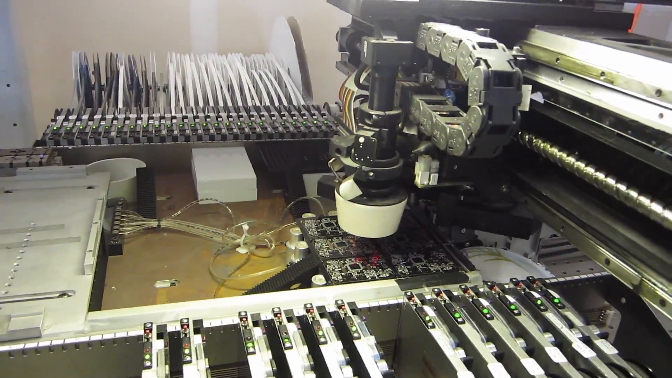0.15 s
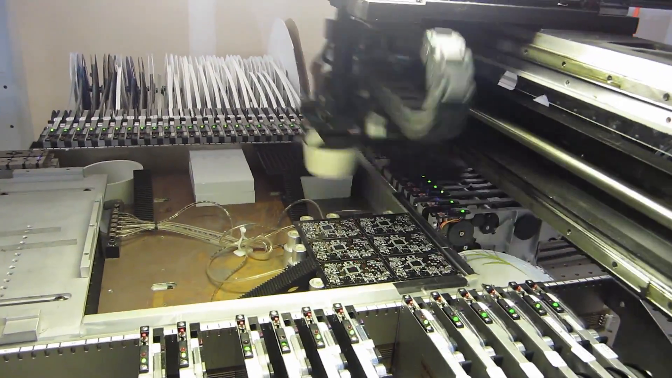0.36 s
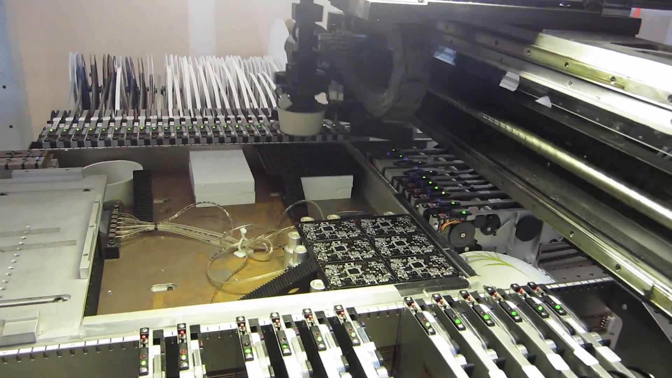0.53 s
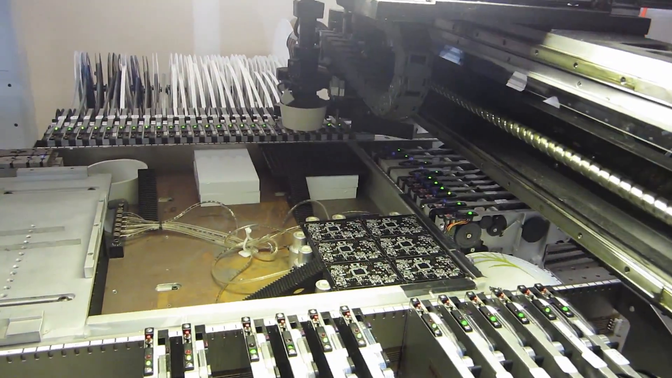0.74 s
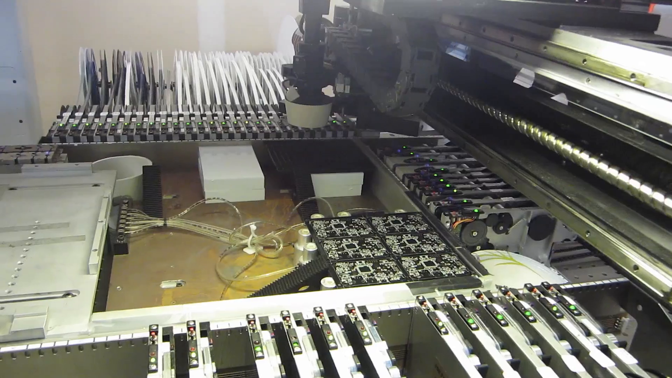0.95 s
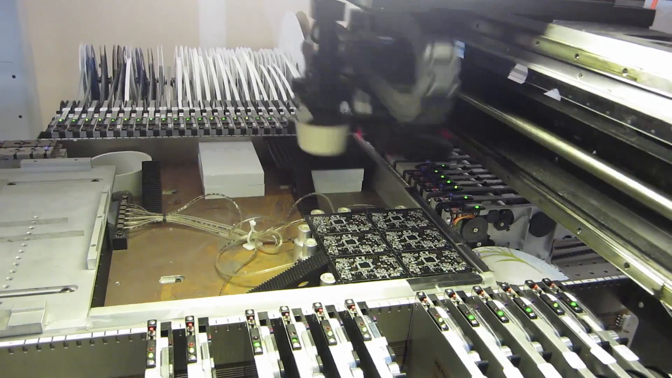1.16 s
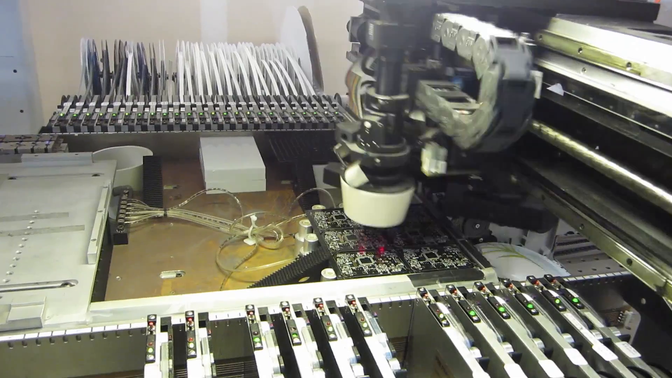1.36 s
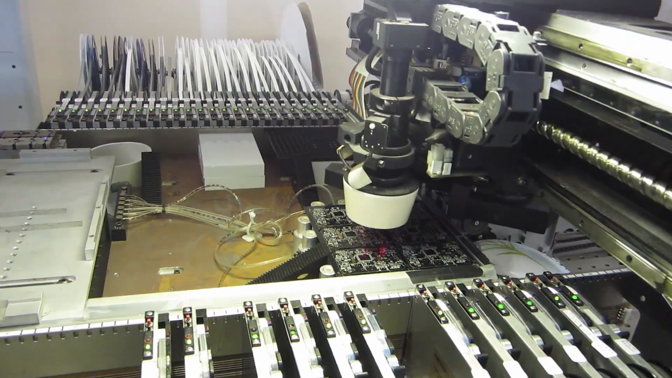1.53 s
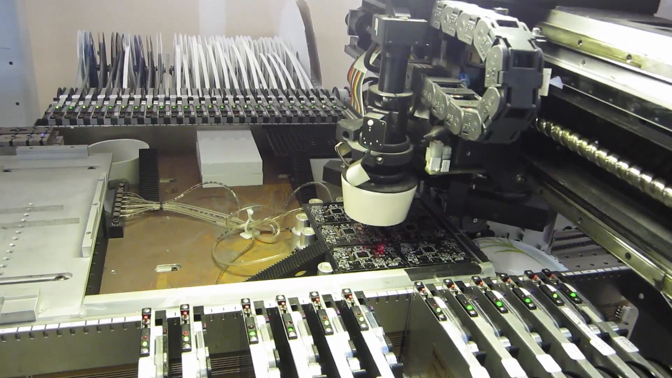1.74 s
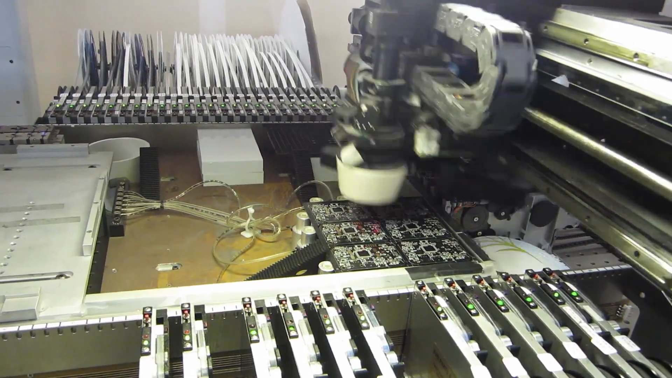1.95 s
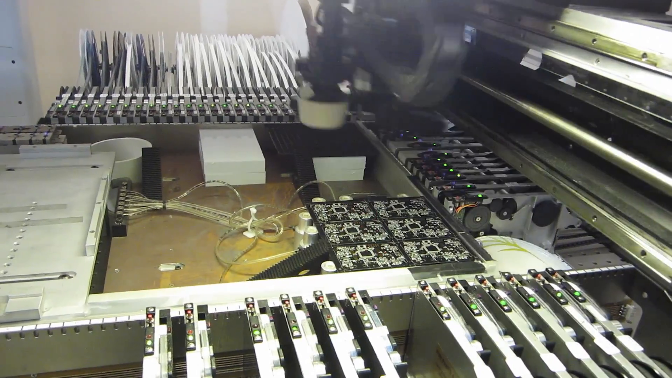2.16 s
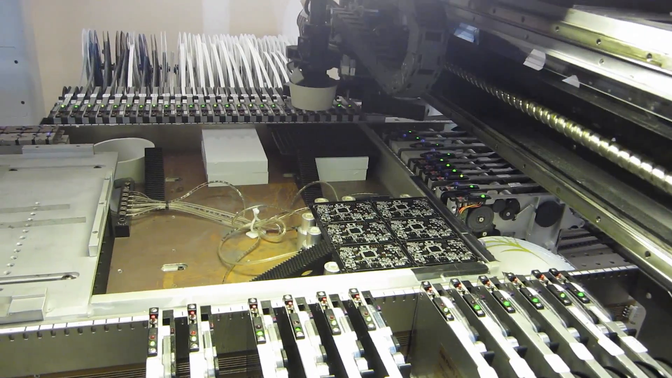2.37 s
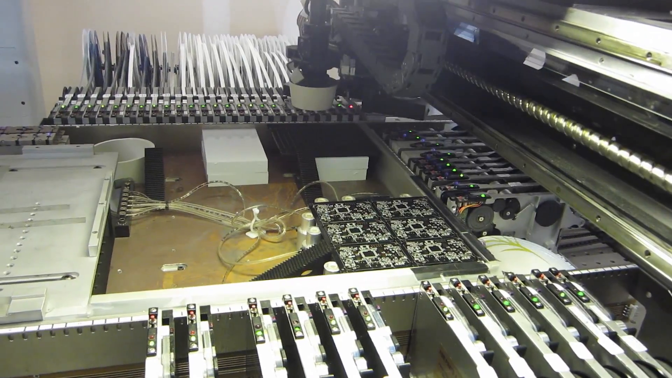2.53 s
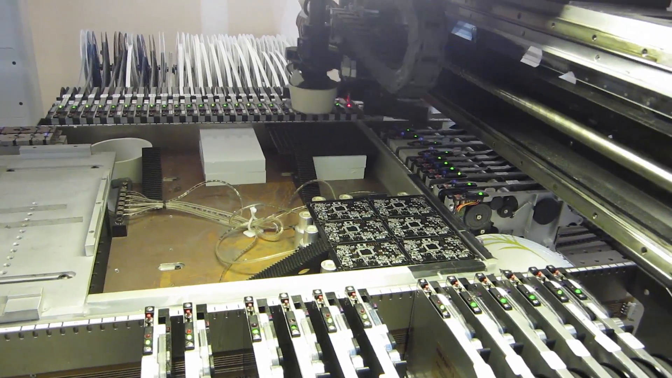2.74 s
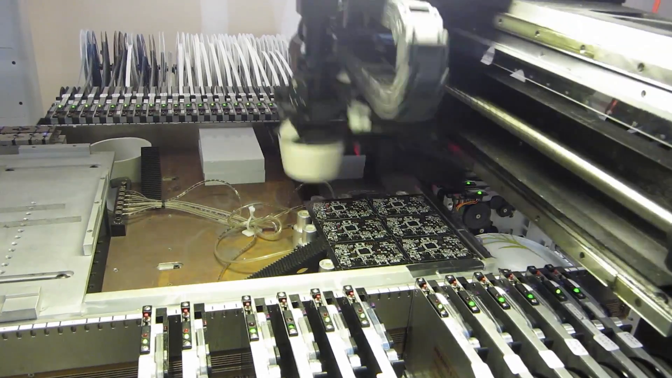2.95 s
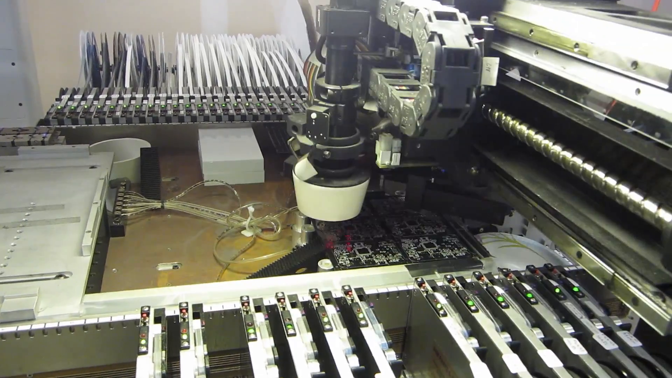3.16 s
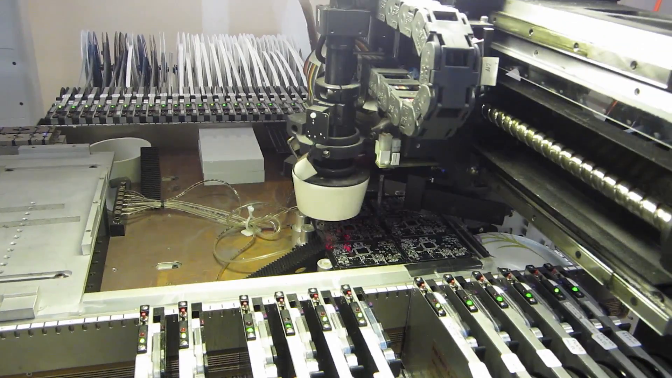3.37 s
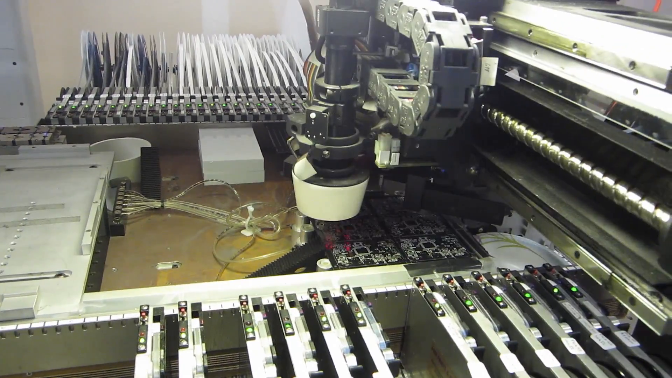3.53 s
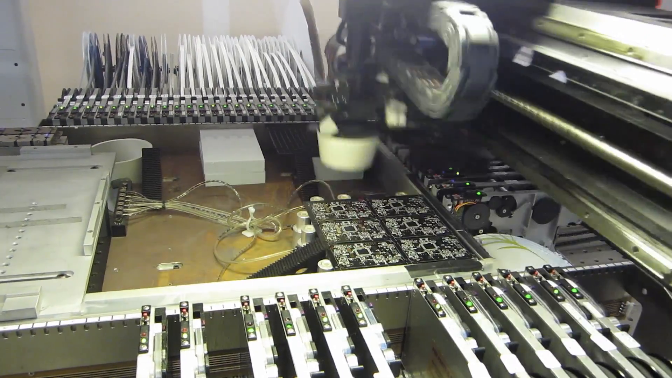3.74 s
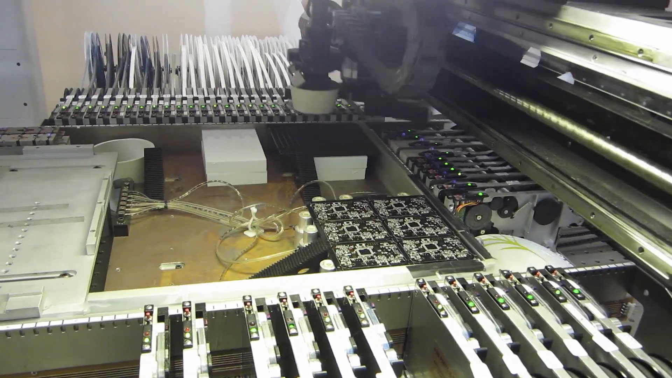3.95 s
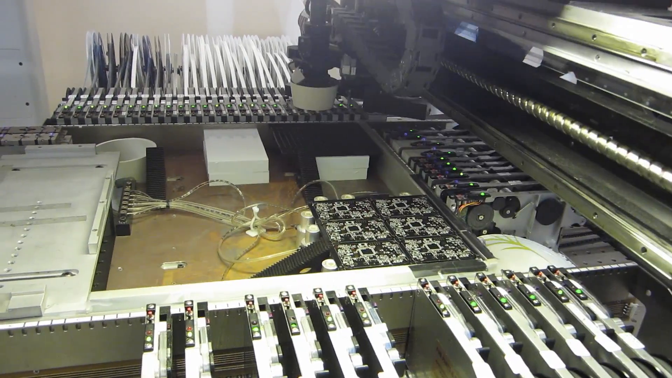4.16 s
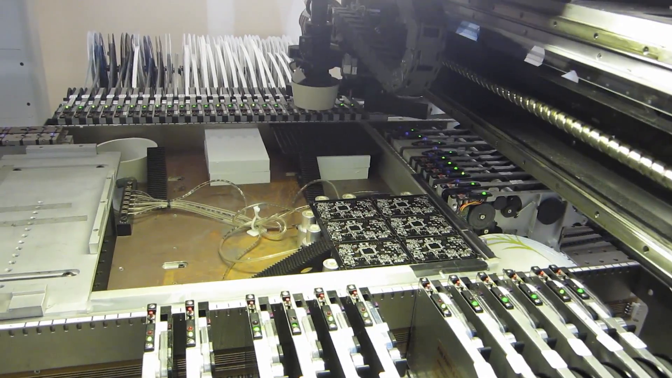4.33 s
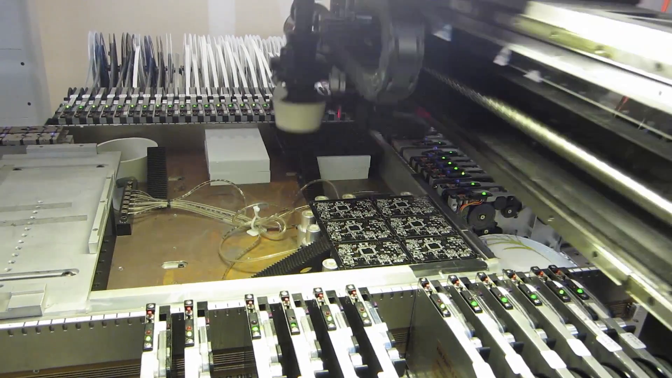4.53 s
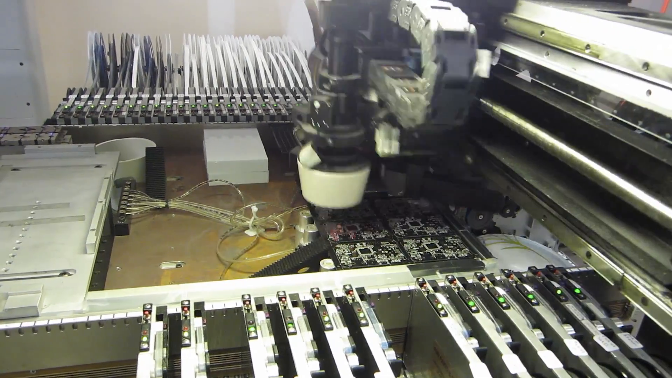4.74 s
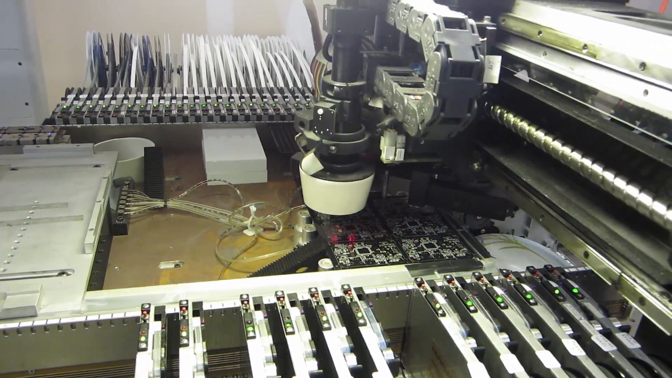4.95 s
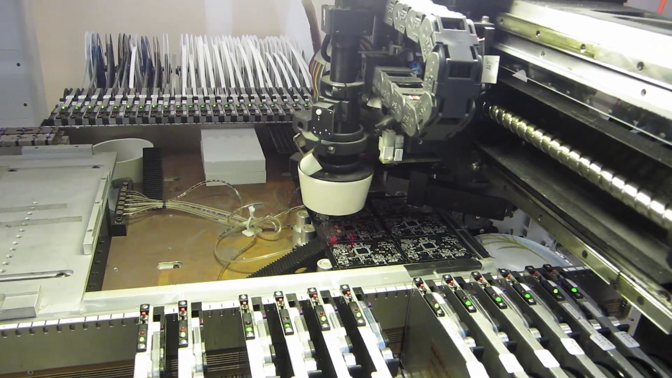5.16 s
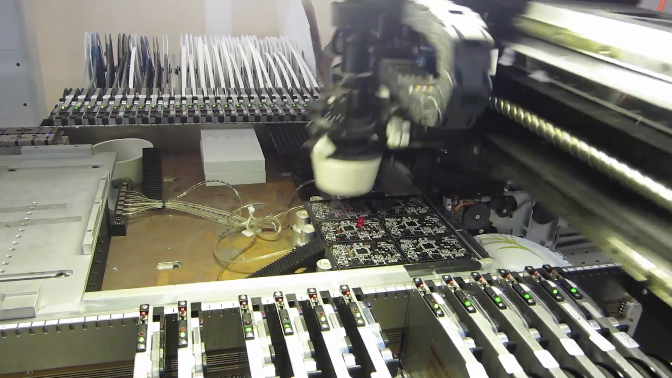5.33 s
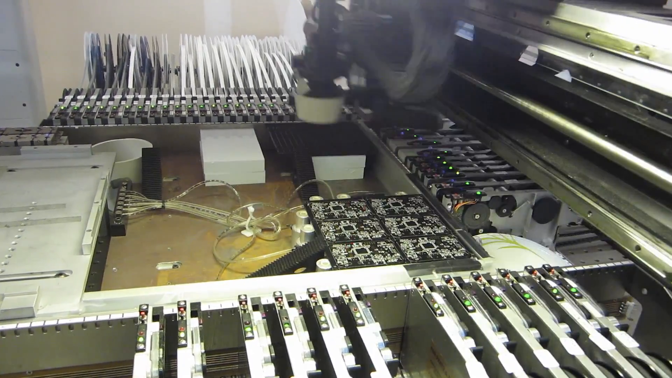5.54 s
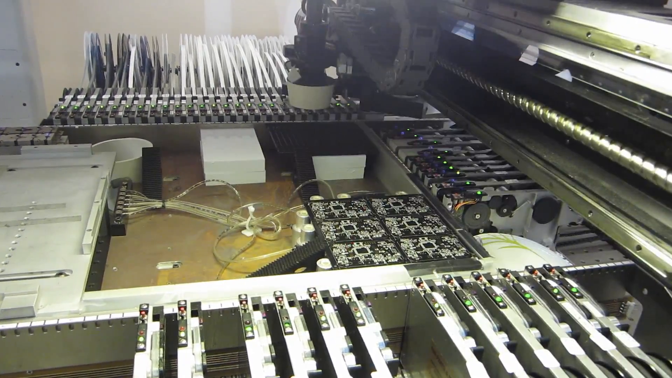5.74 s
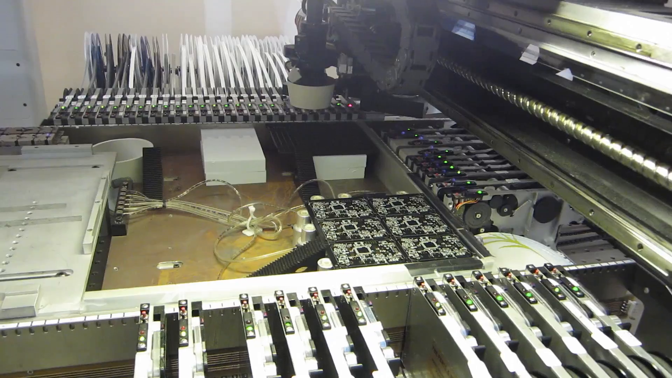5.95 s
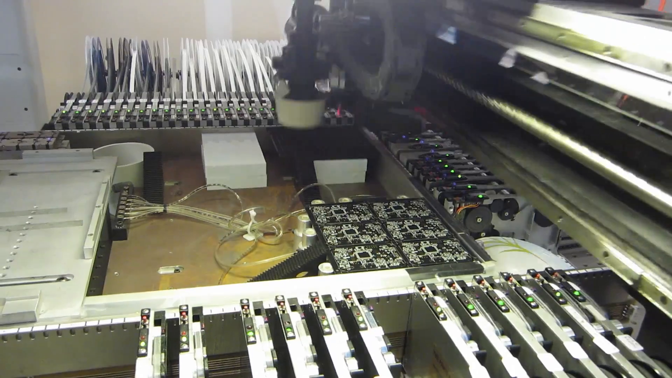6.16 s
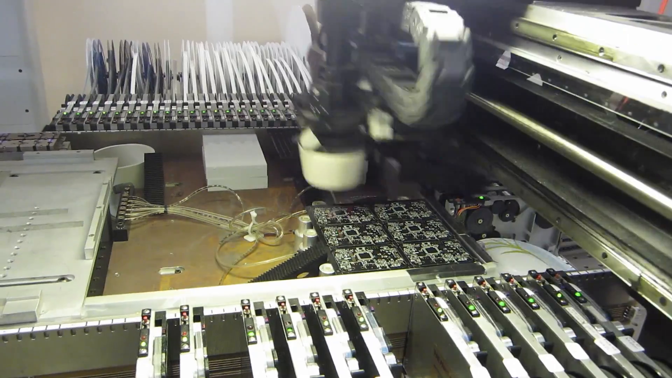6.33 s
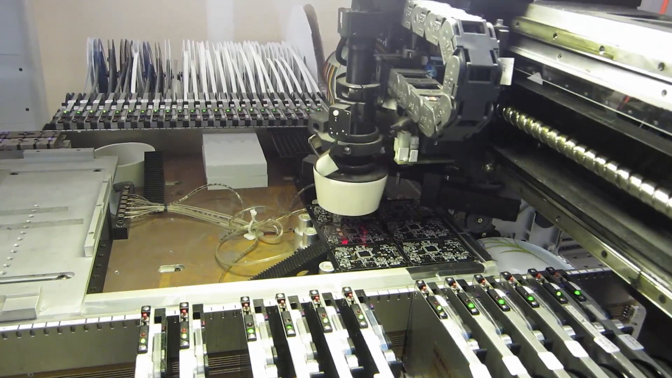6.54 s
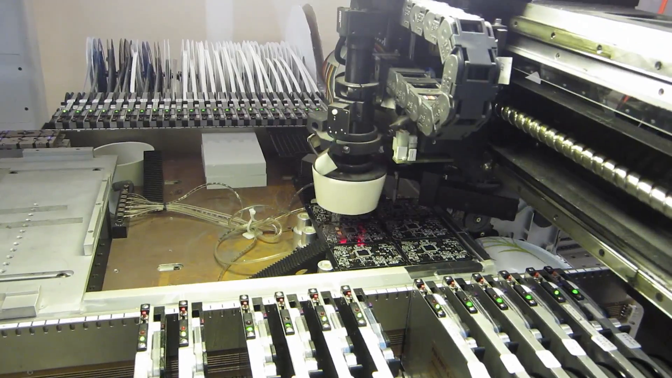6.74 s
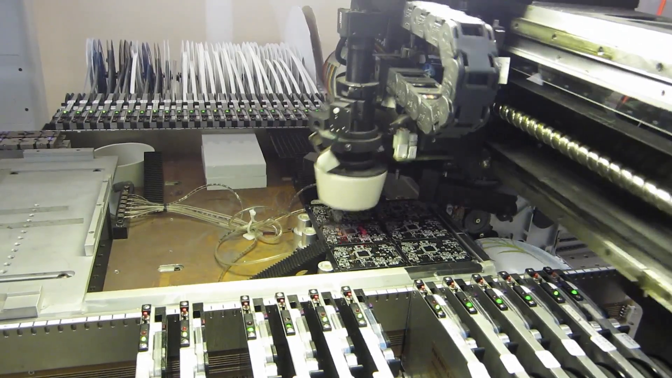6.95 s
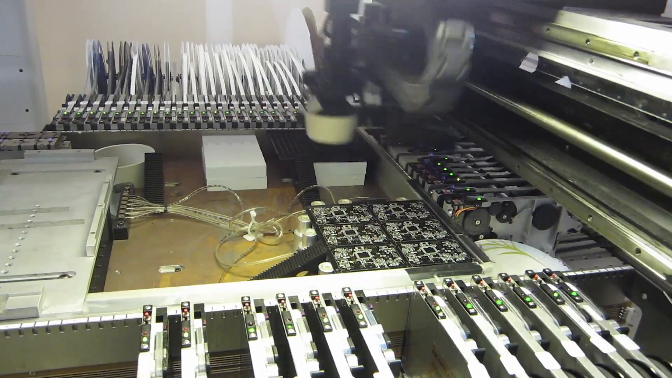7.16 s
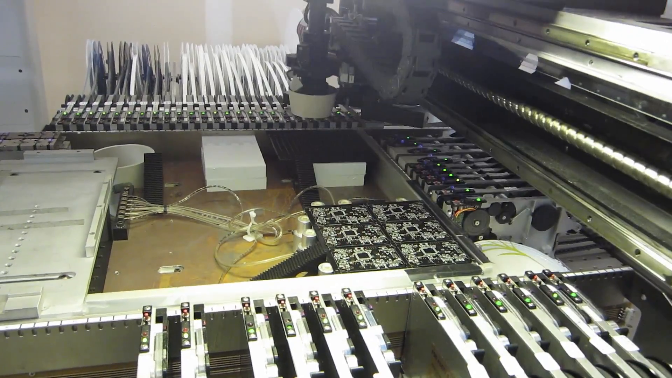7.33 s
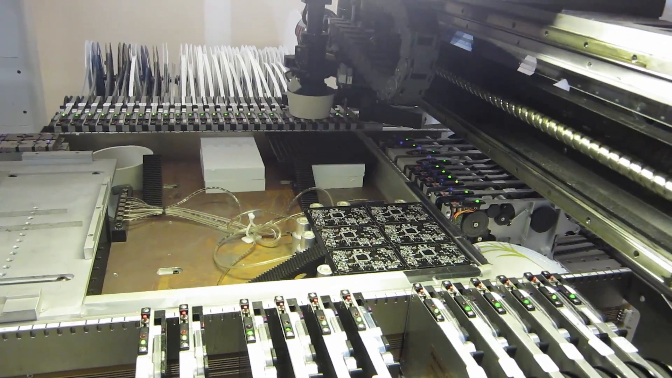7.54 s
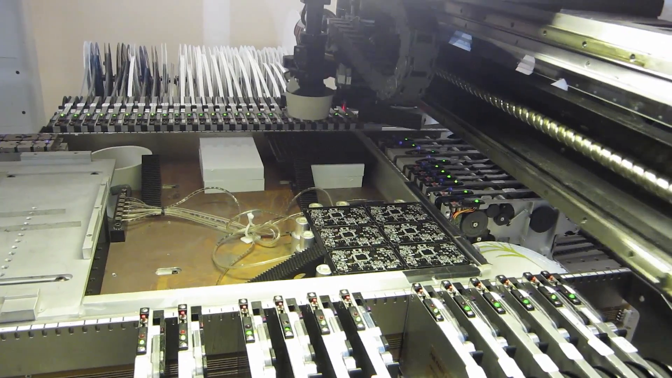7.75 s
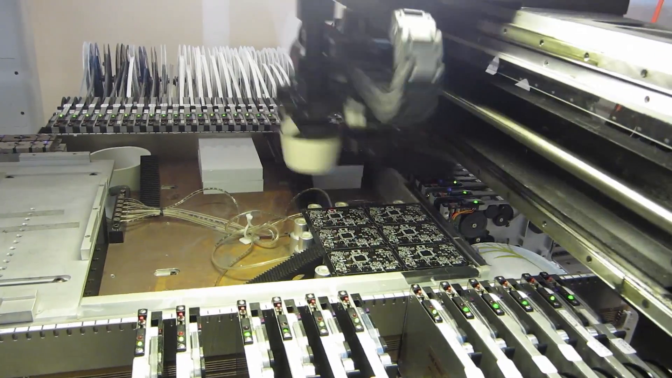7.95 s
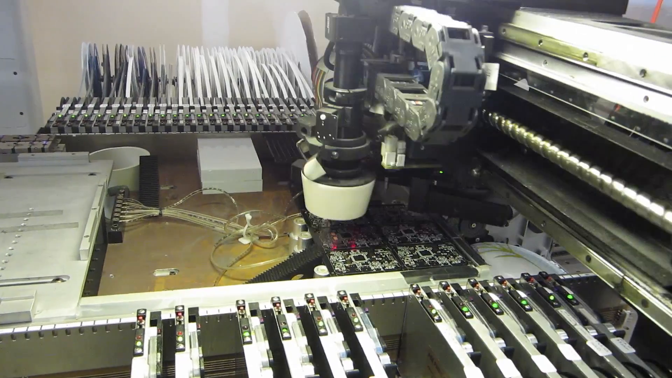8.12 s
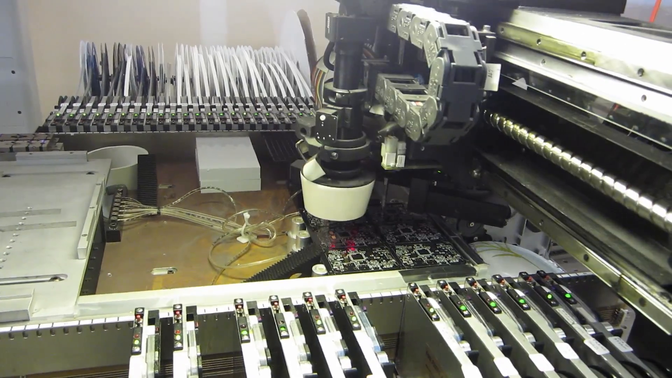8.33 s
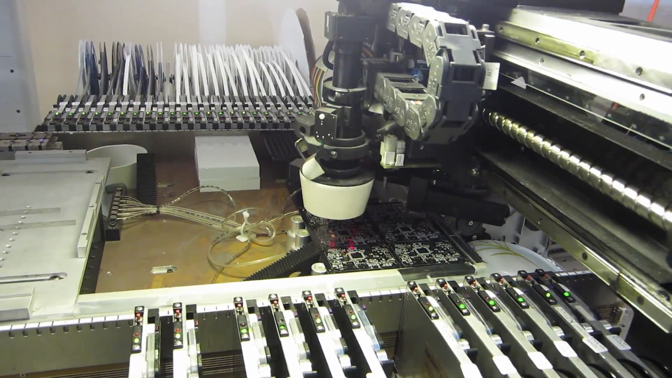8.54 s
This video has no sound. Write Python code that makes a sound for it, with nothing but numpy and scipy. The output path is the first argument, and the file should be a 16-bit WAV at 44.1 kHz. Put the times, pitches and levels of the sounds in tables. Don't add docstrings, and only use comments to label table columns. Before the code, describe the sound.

A machine head shuttles between feeders and circuit board, out and back, in a regular rhythm. Each move swells into a metallic, grainy whoosh with a gliding motor tone, then brakes. Short clean squeals from the nozzle come in twos between moves, with snapping clicks and dull jolts. Low hum and faint airy whistle stay constant. Heard close, mono, with short reverberation from the metal enclosure.

```python
import sys
import numpy as np
from scipy import signal
from scipy.fft import rfft, irfft, next_fast_len
from scipy.io import wavfile
from scipy.ndimage import uniform_filter1d, map_coordinates

SR = 44100
rng = np.random.default_rng(int(sys.argv[2]) if len(sys.argv) > 2 else 0)


def ratio(d):
    e = np.asarray(d, float) / 20
    return 10 ** e


def master(y):
    cut = np.clip(np.atleast_2d(y).T, -1, 1)
    pcm = np.round(cut * 32767)
    wavfile.write(sys.argv[1], SR, pcm.astype(np.int16))


N = 383229
TIME = np.arange(N) / SR

# start_s, stop_s, whine_db, frame_ring_db, belt_rasp_db
MOVES = [(0.21, 0.713, -36.5, -27, -25), (1.038, 1.549, -37.5, -27.5, -26.5),
         (1.908, 2.41, -36, -26.5, -25.5), (2.727, 3.225, -36, -27.5, -27.5),
         (3.63, 4.122, -37, -27.5, -27.5), (4.445, 4.928, -34, -27, -26), (5.287, 5.77, -35.5, -27, -27),
         (6.101, 6.584, -34.5, -27, -27), (6.972, 7.452, -36, -26, -26.5), (7.776, 8.269, -35, -27, -26.5),
         (8.616, 9.097, -38, -26, -22)]


def gantry():
    pace = np.array([speed(start, stop, ramp=.205) for start, stop, *levels in MOVES])
    moving = pace.sum(0)
    return motors(pace) + frame() + belts(moving) + base() + air(moving)


# start_s, stop_s, ramp_s, top_hz, whine_db
CROSS_MOVES = [(1.09, 1.33, .12, 4000, -41), (2.83, 3.08, .125, 4000, -34), (3.645, 3.895, .125, 3980, -33),
               (4.45, 4.67, .11, 3700, -41), (5.295, 5.545, .125, 3700, -36),
               (6.105, 6.325, .11, 3100, -35), (6.98, 7.2, .11, 3200, -35), (7.775, 7.995, .11, 3420, -35)]
# multiple_of_tooth_tone, level_db
CARRIAGE = [(.25, -8), (.5, -4), (.75, -14), (1.5, -21)]
# multiple_of_tooth_tone, level_db
SHAFT = [(.122, -9)]
# pitch_hz, level_db
NOZZLE_TURN = [(1750, -48), (2770, -48), (3500, -43), (5670, -53), (6150, -55)]


def motors(pace):
    tooth_hz = 7000
    moving = pace.sum(0)
    loud = ratio([db for start, stop, db, *rest in MOVES]) @ pace
    strain = 4 * moving * (1 - moving)
    strain_db = np.where(np.gradient(moving) > 0, 3.5, -1.5) * strain
    audible = np.clip(2.8 * moving - .7, 0, 1)
    tooth = whine(tooth_hz * moving, [(1, 3)], flutter_db=2.5 + 4 * strain, rate=140)
    tones = loud * audible * ratio(strain_db) * tooth
    carriage = whine(tooth_hz * moving, CARRIAGE, flutter_db=5.0, rate=90)
    tones += ratio(3.0) * loud * moving ** 4 * carriage
    tones += loud * whine(tooth_hz * moving, SHAFT, flutter_db=6, rate=50)
    turning = speed(6.475, 6.635, ramp=0.053)
    tones += ratio(-1) * turning ** 3 * whine(turning, NOZZLE_TURN, flutter_db=4, rate=150)
    clean = 0
    for start, stop, ramp, top_hz, db in CROSS_MOVES:
        cross = speed(start, stop, ramp)
        tone = whine(top_hz * cross, [(1, 0), (.5, -8)], flutter_db=2, rate=110)
        clean += ratio(db + 9) * cross ** 4 * tone
    return scattered(tones, t60=.05, share=.55) + clean


# start_s, stop_s, frame_ring_db, rasp_db
TURNS = [(-.02, 0.046, -42, -39), (1.42, 1.519, -46, -44), (3.209, 3.298, -48, -35),
         (4.836, 4.92, -47, -39), (4.948, 5.01, -38, -34), (6.494, 6.65, -44, -37.5),
         (8.167, 8.248, -47, -38)]
# pitch_hz, width_hz, level_db
FRAME = [(851, 21, 3), (1073, 22, 5.5), (1182, 42, 11.5), (1300, 35, 9), (1726, 49, 11.5), (2067, 190, 5.5)]
# pitch_hz, density_db_per_hz
FRAME_BED = [(100, -62), (600, -6), (900, 4), (2000, -6), (3000, -24), (8000, -24.5)]


def frame():
    ring = sum(ratio(db) * swell(start, stop, lag=0.0099, rise=0.17, fall=0.29, late=0.045, steep=1.03, sag_db=13)
               for start, stop, _, db, _ in MOVES)
    ring += sum(ratio(db) * speed(start, stop, ramp=0.027) for start, stop, db, _ in TURNS)
    return ring * ratio(0.62 * wobble(60)) * rush(FRAME_BED, FRAME, rough_db=2.0, patchy_db=0.5)


# pitch_hz, width_hz, level_db
BELT = [(2470, 56, 1.7), (2710, 127, 2.7), (3015, 96, 3), (3303, 110, 6.8), (3654, 160, 6.5),
        (4040, 260, 1.7), (5300, 76, 0.84), (5790, 35, 1.5)]
# pitch_hz, density_db_per_hz
BELT_BED = [(600, -23), (2000, 1.5), (3000, 0), (4600, -1), (6500, -2), (9000, -7), (16000, -16.5)]


def belts(moving):
    scrape = sum(ratio(db) * swell(start, stop, lag=0.039, rise=0.11, fall=0.18, late=0.017, steep=1.36, sag_db=15.6)
                 for start, stop, _, _, db in MOVES)
    scrape += ratio(-38.5) * sum(speed(start, stop, ramp) for start, stop, ramp, *rest in CROSS_MOVES)
    scrape += sum(ratio(db) * speed(start, stop, ramp=0.053) for start, stop, _, db in TURNS)
    rasp = rush(BELT_BED, BELT, rough_db=1.2, patchy_db=1.8)
    dull = filtered(rasp, lambda f: 1 / (1 + (f / 3800) ** 6))
    bright = (0.52 + 0.6 * moving ** 2) * (rasp - dull)
    return scrape * ratio(0.92 * wobble(40)) * (dull + bright)


# pitch_hz, width_hz, level_db
BASE = [(422.6, 60, 4.3), (506, 115, 9.9), (567, 26, 0.71)]
# lag_s, rise_s, fall_s, late_s, steepness, sag_db_per_s
BASE_SWELLS = [
    (-.01, 0.058, 0.13, .16, 0.92, 24),
    (-.01, .13, 0.15, 0.19, 0.63, 30),
]


def base():
    level_db = (-38.5, -37.5)
    drone = sum(ratio(level_db[k % 2]) * swell(start, stop, *BASE_SWELLS[k % 2])
                for k, (start, stop, *levels) in enumerate(MOVES))
    noise = filtered(rng.standard_normal(N), lambda f: ringing(BASE, f) ** 2)
    return drone * ratio(1.4 * wobble(25)) * unit(noise)


# pitch_hz, density_db_per_hz
AIR = [(2000, -23), (6000, 0), (9000, -3), (12000, 3), (16000, -18)]


def air(moving):
    return ratio(-42.5) * moving ** 1.5 * rush(AIR, rough_db=2.5)


# start_s, stop_s, held_tone_db, ramp_squeal_db
STROKES = [(0.0833, 0.148, -27.5, -25), (0.77, 0.8213, -38, -37), (0.8808, 0.936, -36.5, -34.5),
           (1.622, 1.6878, -30.5, -25.5), (1.778, 1.8443, -27.5, -24.5), (2.461, 2.513, -41, -37),
           (2.573, 2.625, -38.5, -36), (3.3442, 3.4058, -39, -34.5), (3.5003, 3.567, -30.5, -33.5),
           (4.176, 4.225, -43, -38), (4.288, 4.339, -44, -36), (5.001, 5.063, -36, -31),
           (5.155, 5.2215, -29, -31), (5.8294, 5.88, -44, -38), (5.943, 5.991, -42, -34.5),
           (6.683, 6.746, -36, -28.5), (6.8381, 6.9036, -28.5, -28.5), (7.506, 7.557, -38.8, -37),
           (7.6163, 7.6683, -40, -36), (8.3395, 8.4044, -33, -29.5), (8.4946, 8.5624, -26.5, -30)]
# held_octave_db, nut_tone_db
STROKE_KINDS = [
    (-36.5, -36),
    (-45.5, -39.5),
    (-42, -46.5),
    (-37.5, -36.5),
]
# pitch_hz, width_hz, level_db
HEAD = [(1233, 79, 8.9), (1599, 40, 10), (2200, 72, 7), (3020, 270, 9), (3440, 89, 3.7), (3680, 310, 3.4),
        (6520, 250, 6)]
# pitch_hz, density_db_per_hz
HEAD_BED = [(300, -90), (1000, 6.5), (3000, -3), (4500, 1.5), (7000, -12), (16000, -12)]


def spindle():
    pace = np.array([speed(start, stop, ramp=.022) for start, stop, *levels in STROKES])
    held_db, squeal_db = np.transpose(STROKES)[2:]
    octave_db, nut_db = np.resize(STROKE_KINDS, (len(STROKES), 2)).T
    moving, held, active = pace.sum(0), (pace ** 8).sum(0), np.sign(pace)
    hz = 4395 * moving
    braking_db = 2.56 * (np.gradient(moving) < 0)
    push = moving ** 0.87 * ratio(braking_db) * (1 - held)
    faint_db = -40 * np.maximum(.7 - moving, 0)
    squeal = squeal_db @ active
    sweeps = ratio(-33 + 0.2 * (squeal + 40.0)) * whine(hz, [(1, 0)], flutter_db=2.2, rate=500)
    sweeps += ratio(-1 + faint_db) * whine(hz, [(2, squeal)], flutter_db=2, rate=200)
    screw = ratio(-42) * moving * rush(HEAD_BED, rough_db=3)
    head = filtered(push * sweeps + screw, lambda f: 1 + ringing(HEAD, f))
    head += ratio(-39) * moving ** .6 * rush(FRAME_BED, FRAME[1:4] + HEAD[1:2], rough_db=4.5)
    octave = octave_db @ active
    partials = [(1, held_db @ active), (2, octave), (3, octave - 19)]
    steady = held * whine(hz, partials, flutter_db=1.5, rate=120)
    nut = moving ** 2 * whine(hz, [(.4, nut_db @ active)], flutter_db=2, rate=120)
    nut += ratio(-8) * filtered(nut, lambda f: ringing(HEAD[:2], f))
    return scattered(head, t60=.045, share=.85) + np.sqrt(2) * (steady + nut)


# time_s, peak_db, frame_ring_db, thud_db
CLICKS = [(0.8363, -21.5, -8, -17), (1.496, -25, -8, -25), (2.528, -23, -8, -24), (2.732, -31, -10, -16),
          (3.0844, -21, -6, -15), (3.232, -33, -21, -12), (3.4295, -37, -20, -1.5),
          (4.2416, -22.5, -9, -36), (4.9742, -34, -6, 0.5), (5.0858, -32, -13, -4), (5.895, -23, -8, -33),
          (6.7444, -26, -11, -13), (6.7684, -37, -15, -6), (7.5747, -21, -9, -23), (8.2517, -33, -6, -9),
          (8.4263, -29, -17, -4.5), (8.5011, -23.5, -23, -30)]
# pitch_hz, density_db_per_hz
VALVE = [(500, -11), (1500, -2), (2500, 1), (4500, -7.5), (8500, -10), (11000, -5.5), (15000, -30)]


def clicks():
    out, t = np.zeros(N + SR), np.arange(SR // 8) / SR
    snap = rush(VALVE)
    for time, db, ring_db, thud_db in CLICKS:
        at = round(time * SR)
        crack = 0.51 * ratio(-60 * t / 0.029) * (1 - np.exp(-t / 0.0004)) * snap[at:][:len(t)]
        damping_db = -60 * t / 0.11 - 60 * np.maximum(t - .029, 0) / 0.0096
        hold = ratio(damping_db) * (1 - np.exp(-t / 0.0015))
        ring = 0.93 * ratio(ring_db) * hold * np.sin(2 * np.pi * 1185 * t)
        thud = 1.5 * ratio(thud_db - 60 * t / 0.025) * np.sin(2 * np.pi * 210 * t)
        out[at:][:len(t)] += ratio(db) * (crack + ring + thud)
    return out[:N]


# pitch_hz, t60_s
ENCLOSURE = [(200, 0.69), (2000, 0.12), (10000, 0.073)]


def enclosure(x):
    hz, t, z = signal.stft(rng.standard_normal(SR // 3), SR, nperseg=256)
    decay = ratio(-60 * t / along(ENCLOSURE, hz)[:, None])
    tail = signal.istft(z * decay, SR, nperseg=256)[1]
    return signal.fftconvolve(np.pad(x, (100, 0)), tail / np.linalg.norm(tail))[:N]


# time_s, level_db
BOOMS = [(.31, -45), (.6, -50), (1.19, -45), (1.6, -45), (2.1, -42.5), (2.3, -53), (2.88, -49), (3.29, -54),
         (3.82, -42), (4.65, -48), (4.98, -54), (5.37, -47), (6.38, -50), (6.66, -50.5), (7.16, -44),
         (7.8, -53), (7.97, -49), (8.42, -61), (8.69, -49)]
# time_s, peak_db, pitch_hz, t60_s
THUMPS = [(1.619, -44, 78.1, .25), (2.948, -37, 92, 0.31), (3.288, -38, 80.9, 0.27), (4.96, -47, 99, .25),
          (6.189, -42, 123.6, .25), (6.646, -37, 123.9, .25), (1.515, -29, 501, .15),
          (2.965, -31, 499, 0.18), (3.2, -32, 499, 0.28), (4.908, -25, 498, 0.1), (6.563, -25, 490, 0.099),
          (8.246, -28.5, 500, .2), (.715, -34, 410, .2), (2.39, -33, 415, .15), (4.12, -36, 410, .15),
          (7.425, -33, 430, .2), (8.665, -28, 500, .15), (8.675, -30, 1150, .1), (5.085, -36, 180, .1),
          (4.866, -28, 1250, .1), (6.516, -28, 1210, 0.11), (8.195, -24.5, 1257, 0.092)]


def bench():
    rest_db, boom_s = -51.5, .07
    level = ratio(rest_db) + sum(ratio(db) * np.exp(-((TIME - time) / boom_s) ** 2) for time, db in BOOMS)
    modes = [(101.3, 13.6, -10.5), (196, 25.6, 0.5)]  # pitch_hz, width_hz, level_db
    out = level * unit(filtered(rng.standard_normal(N), lambda f: ringing(modes, f)))
    for time, db, hz, t60 in THUMPS:
        t = np.maximum(TIME - time, 0)
        attack = 1 - np.exp(-t * hz / 2.4)
        out += ratio(db + 1.0 - 60 * t / t60) * attack * np.sin(2 * np.pi * hz * t)
    return out


# pitch_hz, density_db_per_hz
WORKSHOP_BED = [(15, -12), (40, -11), (100, -5.5), (400, -8), (1200, -11), (2600, -17), (4450, -17),
                (4650, -23.5), (6400, -20.5), (7500, -23.5), (8800, -16), (10000, -20.5), (16000, -40)]
# pitch_hz, width_hz, level_db
WORKSHOP_BANDS = [(440, 20, -2), (790, 6.6, 0), (1120, 40, -7), (1860, 21, -42), (3360, 54, -22), (4280, 56, -20),
                  (6930, 43, -9), (7950, 54, -5), (8220, 52, -8), (8700, 100, -9), (9050, 73, -6.5),
          (9520, 29, -15), (10400, 110, -20.5), (10600, 67, -16), (11070, 96, -11.5), (12010, 47, -5.5),
          (13500, 150, -22), (15200, 430, -22)]


def workshop():
    def spectrum(f):
        bands = sum(ratio(db) / (1 + ((f - hz) / (1.4 * width)) ** 2) for hz, width, db in WORKSHOP_BANDS)
        return ratio(along(WORKSHOP_BED, f)) + 0.59 * bands

    return ratio(-42.0 + 0.44 * wobble(2.853)) * unit(filtered(rng.standard_normal(N), spectrum))


def speed(start, stop, ramp):
    return np.sin(np.pi / 2 * np.clip(np.minimum(TIME - start, stop - TIME) / ramp, 0, 1)) ** 2


def swell(start, stop, lag, rise, fall, late, steep, sag_db):
    since = TIME - start - lag
    up = np.clip(since / rise, 0, 1)
    down = np.clip((stop + late - TIME) / fall, 0, 1)
    arch = (np.sin(np.pi / 2 * up) * np.sin(np.pi / 2 * down)) ** (2 * steep)
    return arch * ratio(-sag_db * np.maximum(since - rise, 0))


def whine(hz, orders, flutter_db, rate):
    turn = 2 * np.pi * np.cumsum(hz) / SR
    return sum(ratio(db + flutter_db * wobble(rate)) * np.sin(k * turn + .5 * wobble(rate)) for k, db in orders)


def rush(bed, modes=(), rough_db=0, patchy_db=0):
    z = signal.stft(ratio(rough_db * wobble(300)) * rng.standard_normal(N), nperseg=512)[2]
    field = uniform_filter1d(rng.standard_normal(z.shape), size=3, axis=0)
    field = uniform_filter1d(field, size=8, axis=1)
    noise = signal.istft(z * ratio(patchy_db * unit(field)), nperseg=512)[1][:N]
    return unit(filtered(noise, lambda f: ratio(along(bed, f)) * (1 + ringing(modes, f))))


def scattered(x, t60, share):
    t = np.arange(SR // 10) / SR
    spray = rng.standard_normal(len(t)) * ratio(-60 * t / t60)
    return x + share * signal.fftconvolve(x, spray / np.linalg.norm(spray))[:N]


def ringing(modes, f):
    return sum(ratio(db) * 1j * f * width / (hz * hz - f * f + 1j * f * width) for hz, width, db in modes)


def filtered(x, response):
    m = next_fast_len(N + SR // 2)
    return irfft(rfft(x, m) * response(np.fft.rfftfreq(m, 1 / SR)), m)[:N]


def along(points, hz):
    f, v = np.transpose(points)
    return np.interp(np.log(hz + 1), np.log(f + 1), v)


def wobble(rate):
    return map_coordinates(rng.standard_normal(int(N * rate / SR) + 4), [TIME * rate])


def unit(x):
    return x / np.sqrt(np.mean(x ** 2) + 1e-20)


def scene():
    quick = spindle() + clicks()
    mono = gantry() + quick + ratio(-8.5) * enclosure(quick) + bench() + workshop()
    return np.array([mono, mono])


def band_limit(x):
    return signal.sosfilt(signal.butter(12, 16340, fs=SR, output="sos"), x)


def record(dry):
    limited = np.array([filtered(channel, lambda f: f < 15740) for channel in dry])
    return band_limit(limited)


dry = scene()
out = record(dry)
master(out)
```